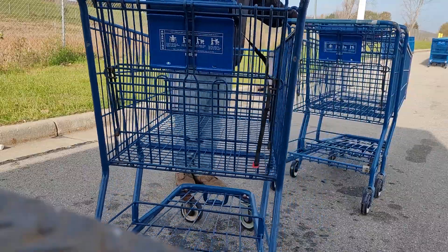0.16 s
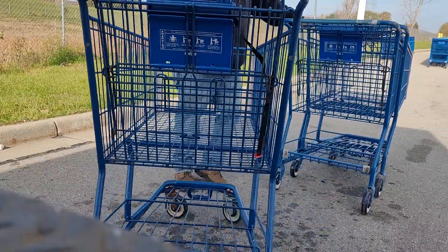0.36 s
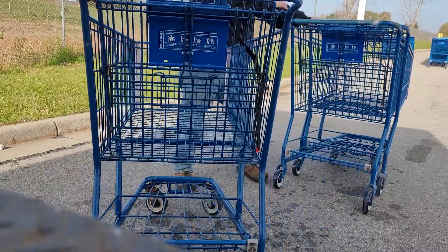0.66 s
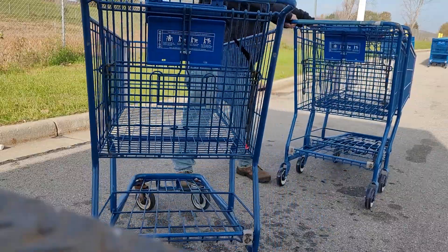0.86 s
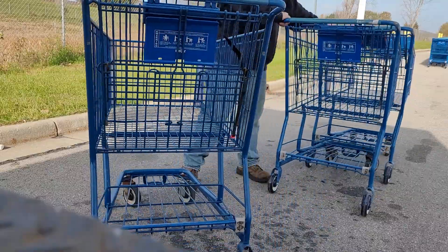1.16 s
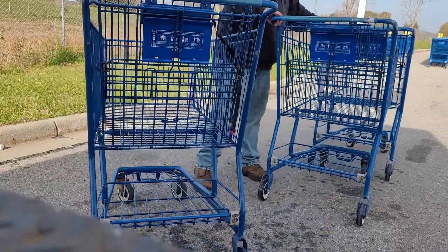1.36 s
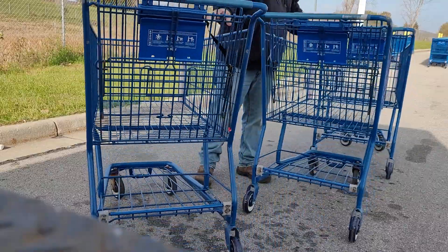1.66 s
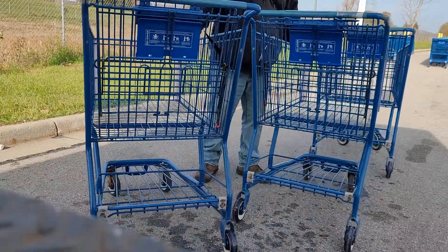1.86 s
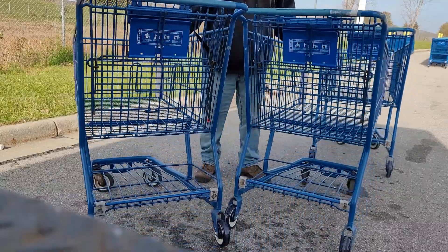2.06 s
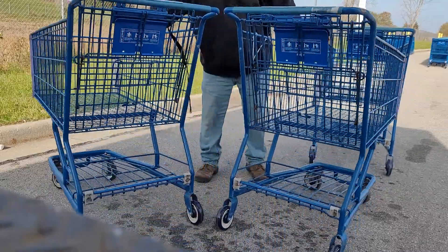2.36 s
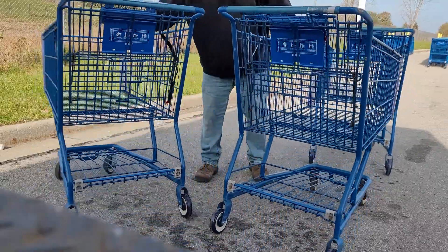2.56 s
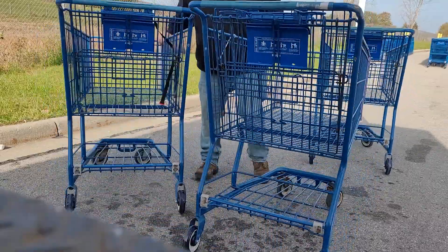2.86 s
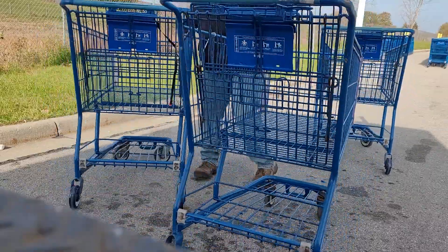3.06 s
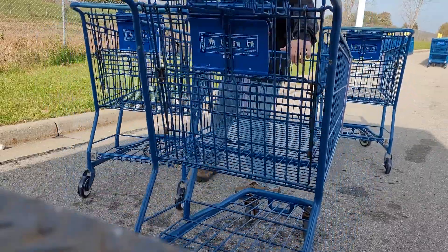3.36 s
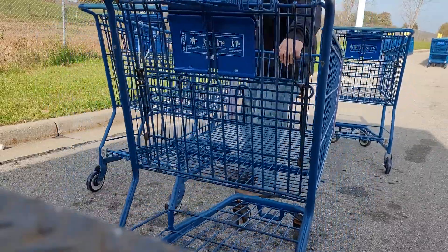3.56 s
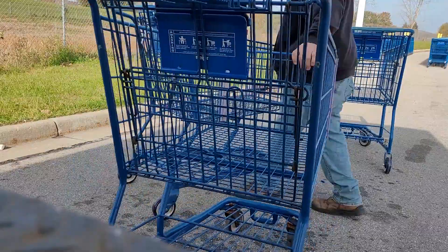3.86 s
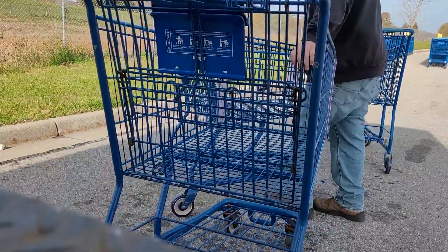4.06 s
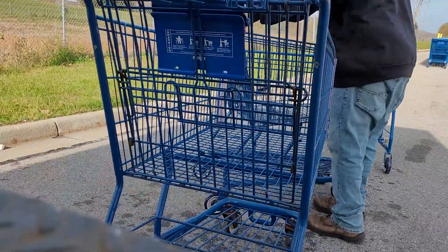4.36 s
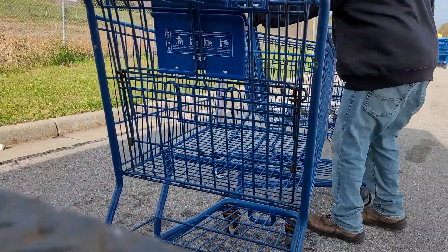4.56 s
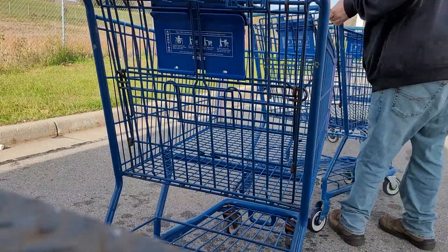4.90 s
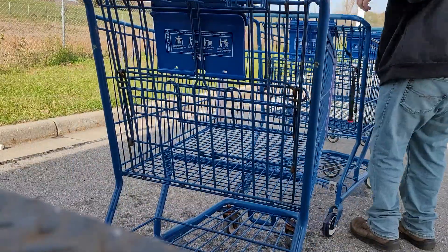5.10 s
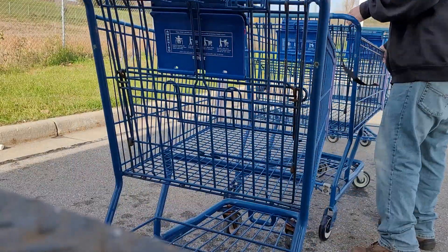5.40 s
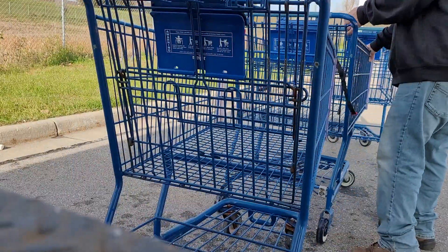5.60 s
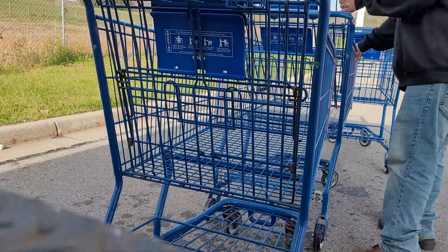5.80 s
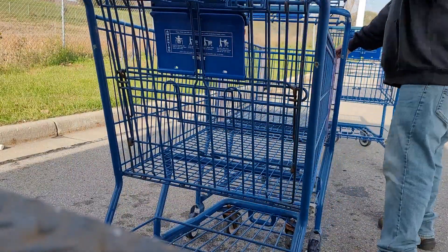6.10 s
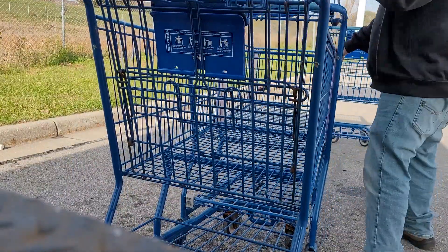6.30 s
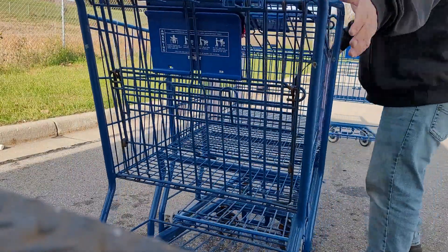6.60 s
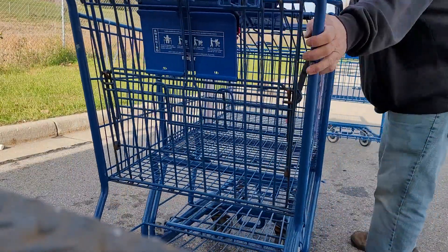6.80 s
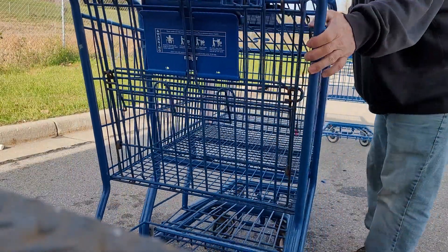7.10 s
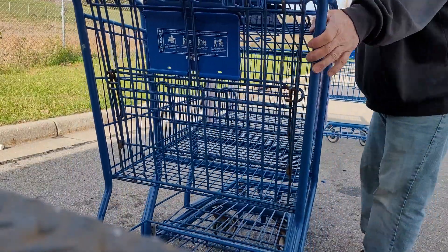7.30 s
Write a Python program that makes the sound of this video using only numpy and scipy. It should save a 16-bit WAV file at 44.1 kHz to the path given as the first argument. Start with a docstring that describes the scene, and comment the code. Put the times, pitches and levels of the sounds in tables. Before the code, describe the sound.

Over a deep, burbling engine idle outdoors, metal carts are shoved around, jangling in bursts, then crash together with bright scraping and chatter.

```python
"""An eight-cylinder engine idles nearby in an open parking lot: pulses ring exhaust resonances, gas puffs hiss.
Scuffs of loose grit and wire scrapes come first, then wire shopping carts are pulled apart close by.
They roll over rough asphalt, are shoved aside and run into one another: random contacts excite ringing filters
for tube frame, basket wires and loose fittings, and jolts set off bursts of chatter.
A hard knock, then a clinking link and a tiny squeak stand out as single blows."""
import sys
import numpy as np
from scipy import signal
from scipy.fft import rfft, irfft
from scipy.io import wavfile
from scipy.ndimage import uniform_filter1d

SR = 44100
rng = np.random.default_rng(int(sys.argv[2]) if len(sys.argv) > 2 else 0)


def int16_out(signal):
    """Quantize to a 16-bit WAV file."""
    q = np.round(np.clip(np.atleast_2d(signal).T, -1, 1) * 32767)
    wavfile.write(sys.argv[1], SR, q.astype(np.int16))


N = 328545
TIME = np.arange(N) / SR

# All levels below are relative: they are balanced against one another in the functions.
# engine speed: time_s, speed_rpm
IDLE_SPEED = [(0.0, 594.7), (1.2, 604.3), (2.0, 599.1), (3.0, 601.6), (4.0, 589.9), (4.8, 588.4),
              (5.6, 592.3), (6.3, 612.9), (7.45, 596.1)]
# firing pattern over two crank turns: crank_angle_deg, pulse_level_db, gas_puff_level_db
CYLINDERS = [(76, -.3, 3), (163.5, 3, -1), (253.5, -.2, 0), (345, 2.4, -3), (434.5, 1.1, -3),
             (522, -6.6, -2), (610, .3, 8), (700, .3, 2)]
# deep exhaust resonances: pitch_hz, width_hz, level_db
EXHAUST_BOOM = [(65.9, 13.1, 0), (78.7, 12, -12)]
# higher exhaust resonances: pitch_hz, width_hz, level_db
EXHAUST_OVERTONES = [(120.6, 23, -33), (161.3, 19, -26.5), (249, 13, -35), (326, 5.6, -34)]
# colour of the exhaust puffs: frequency_hz, density_db_per_hz
PUFF_COLOUR = [(90, -30), (165, -3), (210, -9), (255, 0), (295, -8), (335, -2), (390, -13), (3000, -70)]
# colour of the steady air and engine-bay noise: frequency_hz, density_db_per_hz
AIR_COLOUR = [(20, 3), (55, 2), (100, -5), (170, -1), (350, -5), (500, -12), (1500, -22), (3000, -26),
              (6000, -35), (16000, -48)]

# shoes and skewed wheels scuffing the asphalt: start_s, level_db, length_s
SCUFFS = [(0.038, -40.5, 0.05), (0.551, -59, .005), (.672, -44, 0.014), (3.848, -35.5, 0.016),
          (3.88, -40.5, 0.066), (4.17, -41, 0.027), (4.57, -42, 0.044), (4.583, -38.5, 0.097),
          (4.706, -38.5, .54), (4.915, -30, 0.053), (5.028, -26, .022)]
# colour of a scuff: frequency_hz, density_db_per_hz
SCUFF_COLOUR = [(100, -16), (300, -0.5), (520, 2.5), (900, -1.5), (2000, -5), (4000, -13.5), (7000, -13),
                (16000, -37)]
# likeness of the two ears for carts and scuffs: frequency_hz, likeness (1 = same, 0 = unrelated)
EAR_LIKENESS = [(200, 0.9), (1200, 0), (3000, -.1)]

# one basket sliding along the wires of another: start_s, level_db, length_s
SCRAPES = [(0.053, -59, 0.037), (0.667, -47, 0.0072), (0.809, -48, 0.059), (0.907, -35.5, .07),
           (0.98, -29, 0.1), (4.173, -39.5, 0.054), (4.595, -38.5, 0.17), (5.875, -30.5, 0.11),
           (5.934, -30.5, 0.13), (6.208, -31, .025), (6.239, -24.5, 0.024), (6.392, -21.5, 0.069),
           (6.428, -22, .14), (6.607, -25, .29), (7.006, -23, 0.15)]
# wheels shaking the carts: pulled apart, shoved aside, then run into one another: time_s, level_db
ROLLING = [(0.0, -75), (0.85, -71), (1.03, -43), (1.5, -34), (1.65, -39), (2.13, -39.5), (2.22, -31),
           (2.6, -33.5), (2.8, -42), (3.27, -37.5), (3.76, -48), (4.35, -47.5), (4.53, -51.5), (4.95, -32),
           (5.22, -33), (5.33, -44), (5.48, -39), (5.6, -53), (6.02, -47), (6.2, -54), (6.5, -21),
           (6.93, -30), (7.15, -27.5), (7.45, -40)]
# share of the rolling taken up by the frame, most while the second cart rolls up close: time_s, share_db
FRAME_SHARE = [(1.0, 1.5), (2.1, -3), (3.2, 2), (4.2, -4.5), (5.1, -3), (7.45, -3)]
# bumps and collisions: start_s, wire_chatter_db, frame_blow_db, length_s
JOLTS = [(0.192, -48.5, -46, 0.0049), (0.42, -48, -56, 0.0091), (1.223, -23, -36, 0.026),
         (1.241, -17, -28.5, 0.024), (1.341, -15.5, -20, 0.038), (1.682, -21.5, -27, 0.035),
         (1.849, -33, -25, 0.011), (1.897, -21.5, -26.5, 0.037), (2.183, -24, -23, .006),
         (2.289, -25, -33, .007), (2.356, -20, -28, 0.04), (2.572, -30, -34, 0.022),
         (3.126, -52, -40, .007), (3.184, -27.5, -36, 0.01), (3.443, -31.5, -32, 0.012),
         (3.659, -38.5, -41, 0.012), (3.772, -59, -41, 0.0035), (4.025, -41, -49, 0.012),
         (4.611, -52, -34.5, .012), (5.031, -19, -34.5, 0.042), (5.198, -25, -51, 0.03),
         (5.442, -34, -38, 0.007), (5.671, -28.5, -27, 0.0083), (5.707, -26, -40, 0.0078),
         (5.845, -36, -37, 0.016), (5.851, -25, -37, 0.0045), (5.968, -18, -39, 0.0087),
         (6.354, -19.5, -28, 0.01), (6.469, -15.5, -25, 0.034), (6.576, -34, -21.5, .006),
         (6.684, -17, -24, 0.053), (7.002, -19, -26, 0.043), (7.039, -28, -23, 0.015),
         (7.206, -19, -28.5, 0.037), (7.326, -32.5, -25.5, 0.0086)]
# colour of the tube frame: frequency_hz, density_db_per_hz
FRAME_COLOUR = [(150, -3), (230, -9), (650, -4.5), (800, 2), (980, -6), (1250, 1.5), (1390, 3.5),
                (1480, -8), (1620, -2.5), (1800, -20.5), (5000, -48.5)]
# colour of the basket wires: frequency_hz, density_db_per_hz
BASKET_COLOUR = [(900, -11.5), (1800, -7), (1950, -1.5), (2400, -2.5), (2780, 2), (3250, -0.5), (3750, 0),
                 (5800, -4.5), (12000, -21)]
# colour of the loose fittings: frequency_hz, density_db_per_hz
FITTINGS_COLOUR = [(2500, -31), (7000, -6.5), (9500, -8), (11700, -3.5), (16000, -3.5)]
# long-ringing modes of the tube frame: pitch_hz, level_db, t60_s
FRAME_MODES = [(740, -4, .3), (805, -3, .25), (1184, 0, .4), (1240, -2, .25), (1365, 0, .35)]
# long-ringing modes of the basket wires: pitch_hz, level_db, t60_s
BASKET_MODES = [(2421, -5, .25), (2648, -1, .22), (2770, 0, .18), (2841, 0, .25), (3749, -6, .2),
                (4708, -7, .25)]
# long-ringing modes of the fittings: pitch_hz, level_db, t60_s
FITTING_MODES = [(11900, -2, .12), (13050, -2, .12), (13504, 0, .18), (15152, 0, .15)]
# modes of one hard knock of a wheel caster: pitch_hz, level_db, t60_s
KNOCK_MODES = [(1378, -2, .093), (2406, -10, .08), (2751, -2, .065), (3467, -4, .025)]
# modes of one loose link clinking: pitch_hz, level_db, t60_s
CLINK_MODES = [(3553, -10, .14), (6228, -10, .1), (10050, 0, .11)]

UNEVEN_DB, PUFF_DB = .12, -26  # random spread of the firings, puffs under the boom
SCRAPE_RISE_S, SCRAPE_FALL_S = 0.0081, 0.061  # time constants of a scrape biting and dying away
STONES_PER_S, STONE_DB, STONE_FALL_S = 22, 5, .009  # kick over the steady rolling, its decay time
SNAP = .9  # extra force in the first instant of a jolt, as a share of its level
TREMBLE_DB, SETTLE_S = -8, 0.069  # trembling after a jolt: share of its chatter level, decay time
SCRAPE_FRAME_DB, SCRAPE_FITTINGS_DB = -10, -5  # shares of a scrape passed on to the other parts
ROLL_BASKET_DB, ROLL_FITTINGS_DB = 1.0, 2  # shares of the rolling
SEATED_DB = -46  # below this tug the fittings increasingly stay seated
EDGE_HZ = 16000


def gain_of(db):
    """Decibels to amplitude."""
    return 10 ** (np.asarray(db) / 20)


def evened(x):
    """Scales to rms 1."""
    return x / np.sqrt(np.mean(x ** 2) + 1e-20)


def unit(x):
    """Scales each channel to energy 1."""
    return x / np.linalg.norm(x, axis=-1, keepdims=True)


def read(points, hz):
    """Joins points by straight lines over log frequency."""
    f, value = np.transpose(points)
    return np.interp(np.log(hz + 1), np.log(f + 1), value)


def curve(points):
    """Joins points by straight lines over time."""
    return np.interp(TIME, *np.transpose(points))


def add(mix, s, sound):
    """Mixes a sound in at time s, cut off at the end of the mix."""
    part = mix[:, max(round(s * SR), 0):][:, :sound.shape[1]]
    part += sound[:, :part.shape[1]]


def colour(x, spectrum, size=4096):
    """Minimum-phase filter with the given spectrum, so that attacks stay sharp."""
    log_gain = np.log(gain_of(read(spectrum, abs(np.fft.fftfreq(size, 1 / SR)))))
    minimum_phase = np.exp(np.conj(signal.hilbert(log_gain)))
    taps = np.fft.ifft(minimum_phase).real[:size // 2]
    return signal.oaconvolve(x, taps[None], axes=1)[:, :x.shape[1]]


def noise_pair(size, likeness):
    """Two white noises that are alike by a share that depends on frequency."""
    a, b = rfft(rng.standard_normal((2, size)))
    same = np.clip(read(likeness, np.fft.rfftfreq(size, 1 / SR)), -1, 1)
    return irfft([a, same * a + np.sqrt(1 - same ** 2) * b], size)


def flutter(slow_hz, fast_hz):
    """Slow random wander of rms 1, between two rates."""
    t = TIME[::64]
    f = np.fft.rfftfreq(len(t), t[1])
    band = (f > slow_hz) * (f < fast_hz) / np.sqrt(f + 1)
    waves = irfft(rfft(rng.standard_normal(len(t))) * band, len(t))
    return np.interp(TIME, t, evened(waves))


def bursts(times, levels_db, lengths, fall, snap=0):
    """Power of bursts that start with a snap, last for their length, then settle."""
    power, t = np.zeros((1, N)), np.arange(SR // 3) / SR
    for s, db, length in zip(times, levels_db, lengths):
        hold_and_settle = np.exp(-np.maximum(t - length, 0) / fall)
        shape = (1 + snap * np.exp(-t / 0.0011)) * hold_and_settle
        add(power, s, (gain_of(db) * shape)[None] ** 2)
    return power[0]


def contacts(per_s, spread_db):
    """Random contacts of uneven size and sign, evened to steady local power."""
    size = gain_of(spread_db * np.minimum(rng.exponential(1, N), 4)) * rng.choice([-1, 1], N)
    clicks = size * (rng.random(N) < per_s / SR)
    return clicks / np.sqrt(abs(uniform_filter1d(clicks ** 2, size=900)) + 1e-4)


def engine(level_db=-20.0, db_per_rpm=0.0445):
    """Uneven firings boom in the exhaust; each also lets out a puff of turbulent gas."""
    rpm = curve(IDLE_SPEED)
    cycles = np.cumsum(rpm) / (2 * 60 * SR)  # one cycle is two crank turns
    pulses, vents = np.zeros((2, N))
    for angle, db, vent_db in CYLINDERS:
        at = np.flatnonzero(np.diff(np.floor(cycles - angle / 720)))
        vents[at] = gain_of(vent_db)
        # more fuel: faster and louder
        speed_db = db_per_rpm * (rpm[at] - rpm.mean())
        pulses[at] = gain_of(db + speed_db + UNEVEN_DB * rng.standard_normal(len(at)))
    f = np.fft.rfftfreq(2 * N, 1 / SR) + 1e-3
    pipe = sum(gain_of(db) / (1 + 1j * (f ** 2 - hz ** 2) / (f * width)) ** 2
               for hz, width, db in EXHAUST_BOOM + EXHAUST_OVERTONES)
    # the engine has been running all along: repeat its first cycle back in time
    earlier = np.resize(pulses[cycles < 1][::-1], N)[::-1]
    ports = np.exp(.15j * np.array([[1], [-1]]))  # the boom reaches the left ear a little sooner
    boom = evened(irfft(rfft(np.r_[earlier, pulses]) * pipe * ports)[:, N:])
    puff_shape = signal.lfilter([1], [1, -np.exp(-1 / (0.0057 * SR))], vents)
    gas = puff_shape * noise_pair(N, [(100, 1.0), (400, 0.19)])
    puffs = evened(colour(gas, PUFF_COLOUR))
    return gain_of(level_db) * (boom + gain_of(PUFF_DB) * puffs) * gain_of([[-.8], [.7]])


def air(level_db=-41.5):
    """Open-air rumble and faint hiss: coloured noise, nearly mono in the bass."""
    noise = noise_pair(N, [(100, 1.0), (400, 0.067), (2000, 0.091)])
    return gain_of(level_db) * evened(colour(noise, AIR_COLOUR))


def shoes():
    """Soles and wheels drag over loose grit: dense dry grains that do not ring."""
    drag = np.sqrt(bursts(*np.transpose(SCUFFS), fall=0.015))
    grains = contacts(per_s=4500, spread_db=4) * noise_pair(N, EAR_LIKENESS)
    return drag * evened(colour(grains, SCUFF_COLOUR))


def stones():
    """Gain of the rolling: stones under the wheels kick sharply at random moments."""
    kicks = (rng.random(N) < STONES_PER_S / SR) * rng.uniform(0, 1.9, N)
    power = signal.lfilter([1], [1, -np.exp(-2 / (STONE_FALL_S * SR))], kicks)
    return evened(np.sqrt(1 + gain_of(STONE_DB) ** 2 * power))


def scrapes():
    """Force of wire sliding on wire: it bites, holds and dies away."""
    power = bursts(*np.transpose(SCRAPES), fall=SCRAPE_FALL_S)
    keep = np.exp(-1 / (SCRAPE_RISE_S * SR))
    return np.sqrt(signal.lfilter([1 - keep], [1, -keep], power))


def ring(modes):
    """Dying sines; each reaches the two ears with its own phase."""
    t = np.arange(SR // 2) / SR
    return sum(gain_of(db - 60 * t / t60) * np.sin(2 * np.pi * (hz * t + rng.random((2, 1))))
               for hz, db, t60 in modes)


def response(spectrum, modes, t60, crack_db, modes_db):
    """One contact: a short crack, a dense ring of noise and a few long modes."""
    t = np.arange(SR // 2) / SR
    crack = unit(noise_pair(len(t), EAR_LIKENESS) * np.exp(-t / 0.00035))
    dense_ring = unit(noise_pair(len(t), EAR_LIKENESS) * gain_of(-60 * t / t60))
    body = unit(colour(gain_of(crack_db) * crack + dense_ring, spectrum))
    return unit(body + gain_of(modes_db) * unit(ring(modes)))


def rattle(clicks, shake, jolts, spectrum, modes, t60, crack_db, modes_db, count=6):
    """Contacts land on a few places of one part of the cart; which places ring most shifts as it moves."""
    force = clicks * np.sqrt(shake ** 2 + jolts)  # jolts are given as power
    place = np.argmax([flutter(.3, 4) + rng.standard_normal(N) for _ in range(count)], axis=0)
    out = np.zeros((2, N))
    for k in range(count):
        place_ring = response(spectrum, modes, t60, crack_db, modes_db)
        out += signal.oaconvolve((force * (place == k))[None], place_ring, axes=1)[:, :N]
    return out


def carts(grit_db=2.0):
    """Frame, basket and fittings answer the same rolling, scrapes and jolts, each by its own share."""
    bunching = evened(gain_of(grit_db * flutter(5.6, 68)))  # rough asphalt bunches the contacts
    grit = bunching * stones()
    roll = grit * gain_of(curve(ROLLING))
    scrape = grit * scrapes()
    s, chatter_db, blow_db, length = np.transpose(JOLTS)
    tremble = bursts(s, chatter_db + TREMBLE_DB, length, fall=SETTLE_S)

    # steady shaking of each part; the fittings come loose only when tugged hard enough
    frame_shake = np.hypot(gain_of(curve(FRAME_SHARE)) * roll, gain_of(SCRAPE_FRAME_DB) * scrape)
    basket_shake = np.hypot(gain_of(ROLL_BASKET_DB) * roll, scrape)
    fittings_roll = gain_of(ROLL_FITTINGS_DB) * roll
    fittings_scrape = gain_of(SCRAPE_FITTINGS_DB) * scrape
    tug = np.sqrt(fittings_roll ** 2 + fittings_scrape ** 2 + tremble)
    fittings_shake = tug ** 2 / np.hypot(tug, gain_of(SEATED_DB))

    # jolts: the stiff frame takes a short blow, wires and fittings chatter on
    blows = bursts(s, blow_db, length, fall=0.003, snap=SNAP) + 0.17 * tremble
    wire_jolts = bursts(s, chatter_db - 6.5, length, fall=0.027, snap=SNAP) + tremble
    fitting_jolts = bursts(s, chatter_db + .5, length, fall=0.012, snap=SNAP)

    bumps = contacts(per_s=520, spread_db=3.0)
    chatter = contacts(per_s=1700, spread_db=2)  # shared by basket and fittings
    frame = rattle(bumps, frame_shake, blows, FRAME_COLOUR, FRAME_MODES,
                   t60=.13, crack_db=-2.0, modes_db=-10)
    basket = rattle(chatter, basket_shake, wire_jolts, BASKET_COLOUR, BASKET_MODES,
                    t60=0.1, crack_db=-4.5, modes_db=-15.5)
    fittings = rattle(chatter, fittings_shake, fitting_jolts, FITTINGS_COLOUR, FITTING_MODES,
                      t60=0.089, crack_db=-6.5, modes_db=-17)
    # each part leans slightly to the right
    return (frame * gain_of([[-.6], [.6]]) + basket * gain_of([[-.9], [.9]])
            + fittings * gain_of([[-.5], [.5]]))


def strikes():
    """Single blows of ringing modes and noise ticks: a caster knocks, a link clinks, a wire slips and squeaks."""
    out, t = np.zeros((2, N)), np.arange(SR // 2) / SR
    tick = rng.standard_normal((2, len(t))) * np.exp(-t / 0.0095)
    knock_tick = colour(tick, BASKET_COLOUR) + colour(tick, FRAME_COLOUR)
    add(out, 2.160, gain_of(-11.5) * ring(KNOCK_MODES) + gain_of(-22) * knock_tick)
    add(out, 5.561, gain_of(-34) * ring(CLINK_MODES) + gain_of(-19) * colour(tick, FITTINGS_COLOUR))
    squeak = colour(tick, [(6000, -38), (8500, 4), (12000, -40)])
    add(out, 5.950, gain_of(-16) * squeak)
    return out


def scene():
    """Carts and footwork in front of the idling engine."""
    return engine() + air() + shoes() + carts() + strikes()


def record(dry):
    """Low-pass filter that removes the treble above EDGE_HZ."""
    low_pass = signal.firwin(511, EDGE_HZ, window=("kaiser", 9), fs=SR)
    return signal.oaconvolve(dry, low_pass[None], "same")


dry = scene()
out = record(dry)
int16_out(out)
```